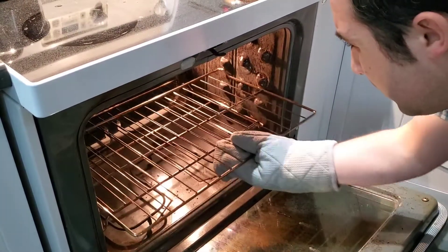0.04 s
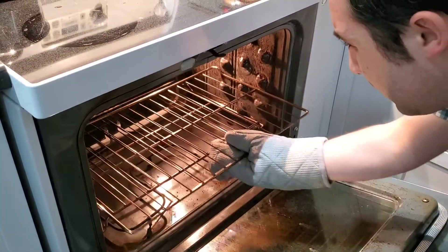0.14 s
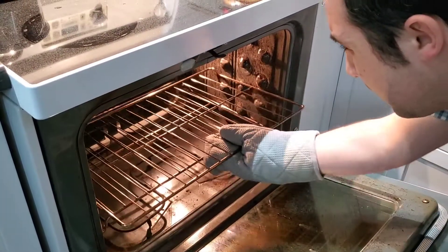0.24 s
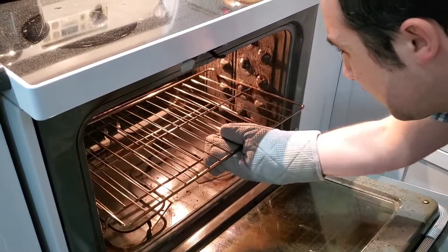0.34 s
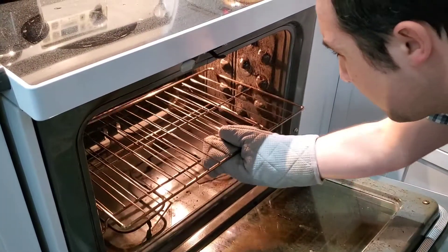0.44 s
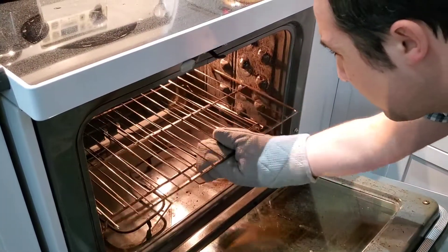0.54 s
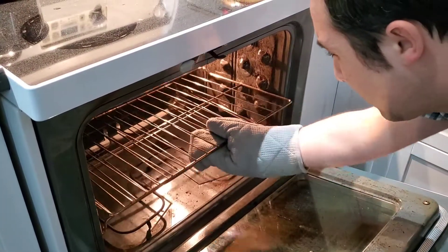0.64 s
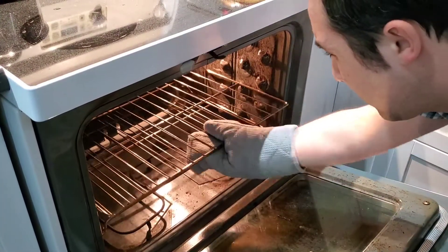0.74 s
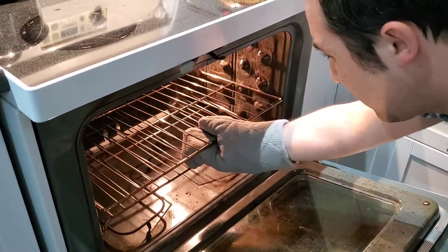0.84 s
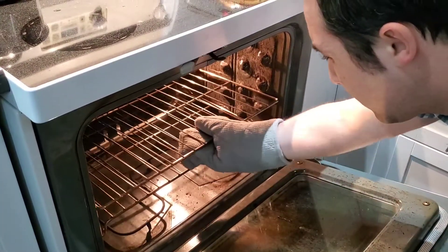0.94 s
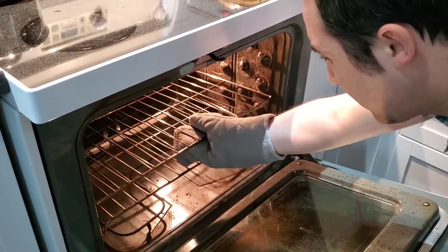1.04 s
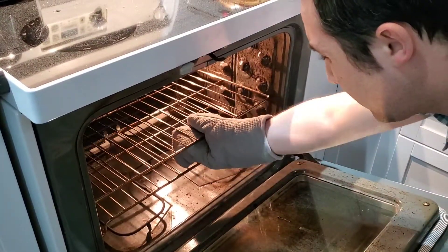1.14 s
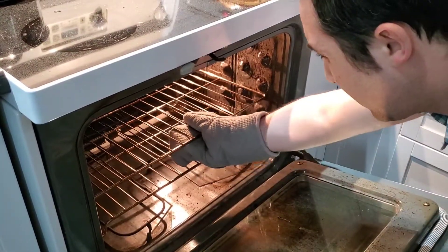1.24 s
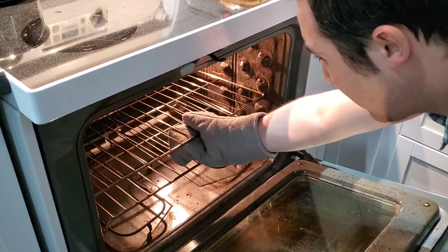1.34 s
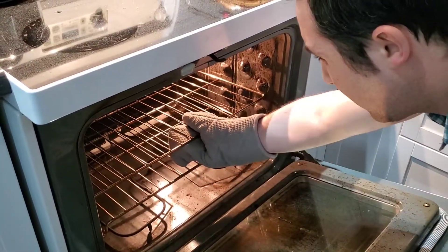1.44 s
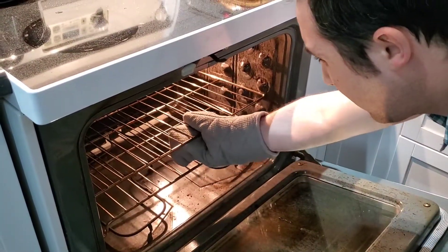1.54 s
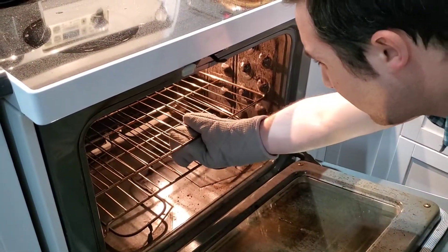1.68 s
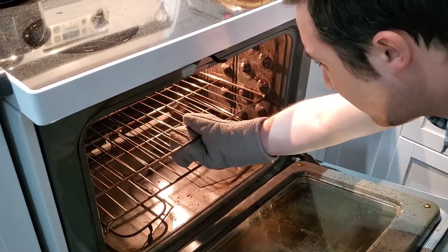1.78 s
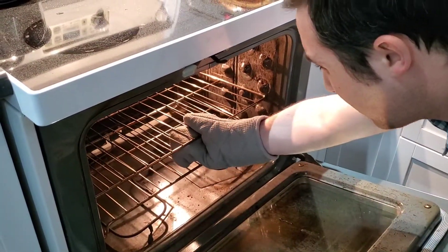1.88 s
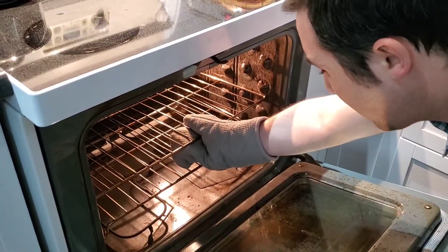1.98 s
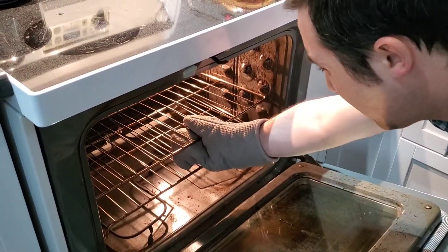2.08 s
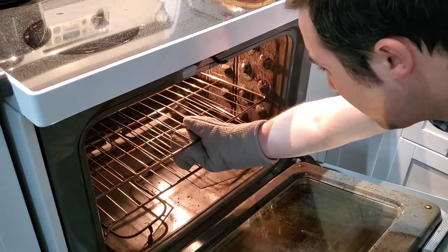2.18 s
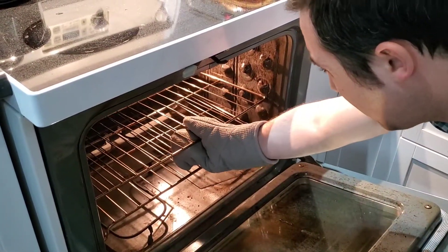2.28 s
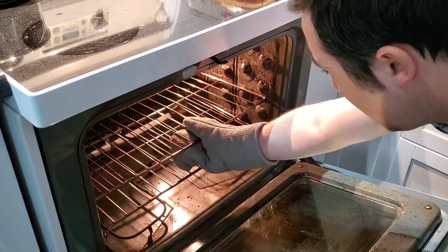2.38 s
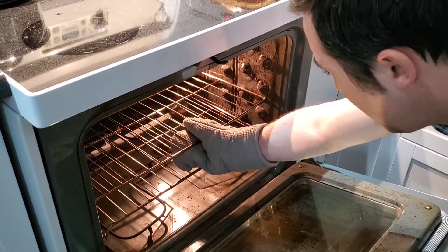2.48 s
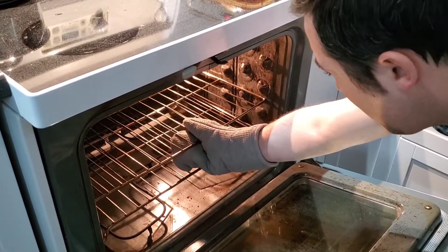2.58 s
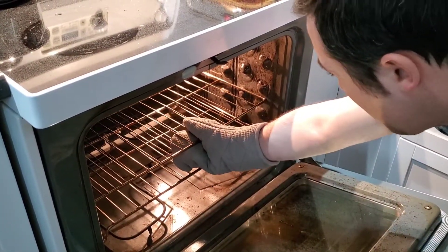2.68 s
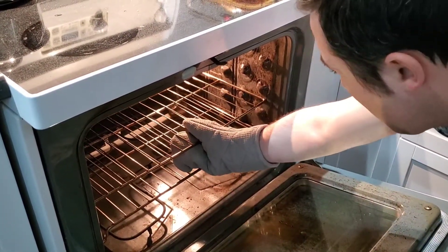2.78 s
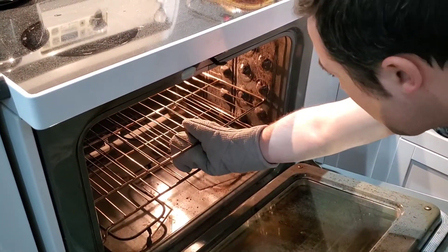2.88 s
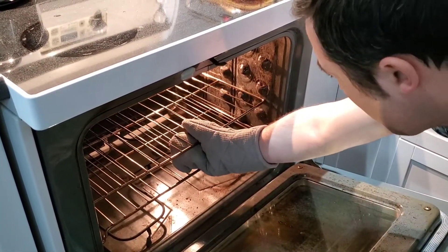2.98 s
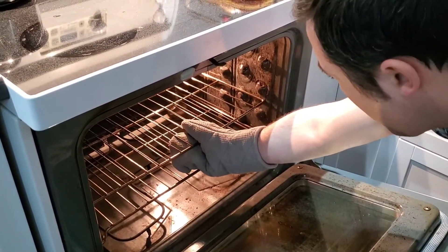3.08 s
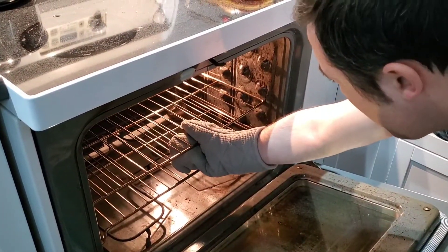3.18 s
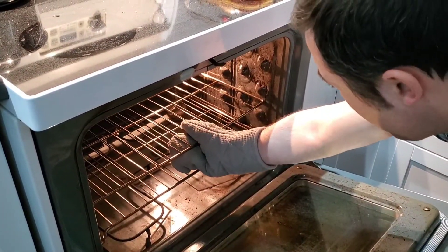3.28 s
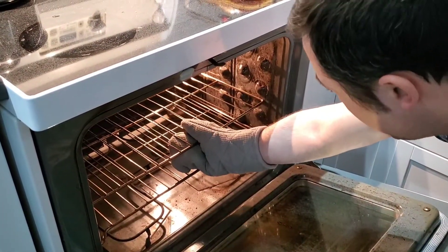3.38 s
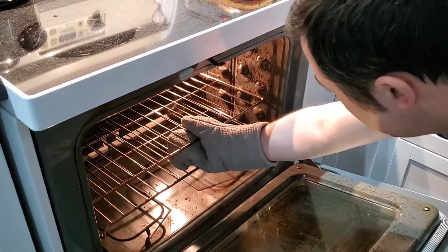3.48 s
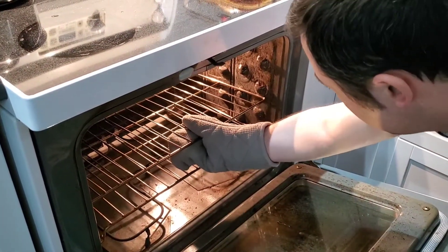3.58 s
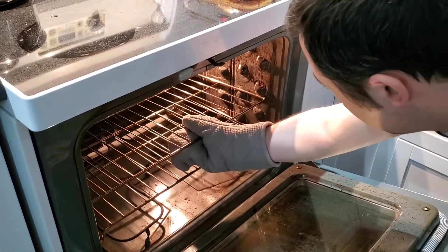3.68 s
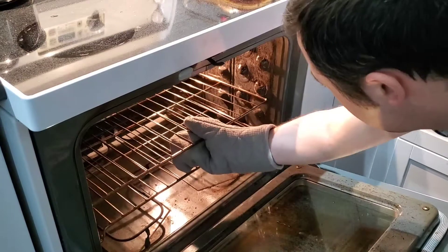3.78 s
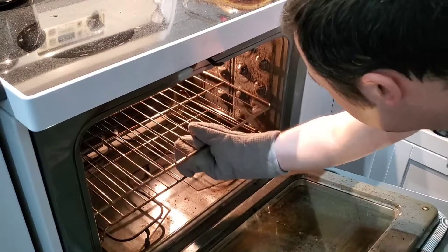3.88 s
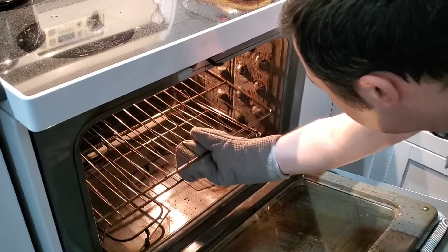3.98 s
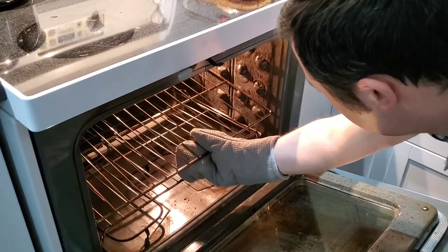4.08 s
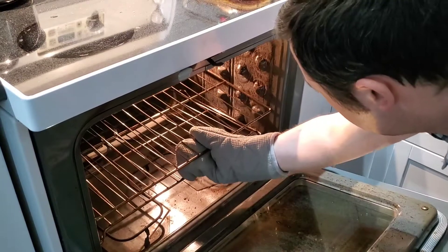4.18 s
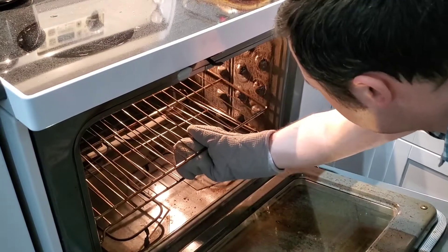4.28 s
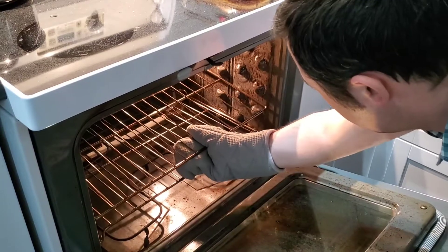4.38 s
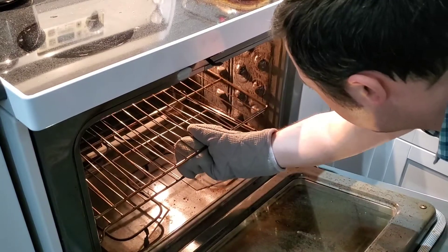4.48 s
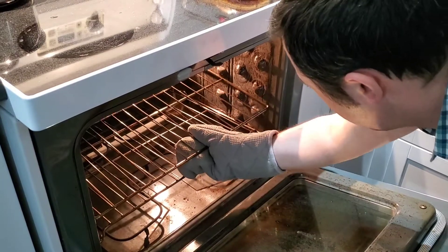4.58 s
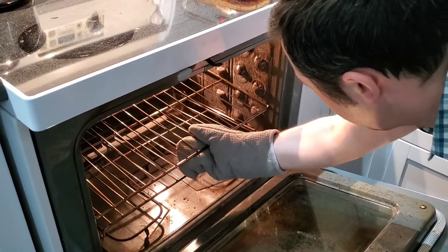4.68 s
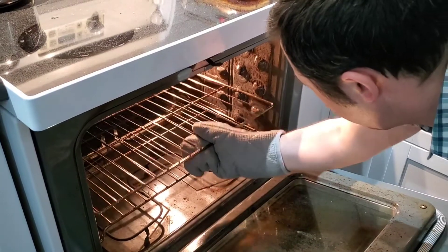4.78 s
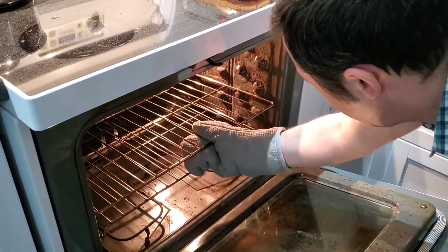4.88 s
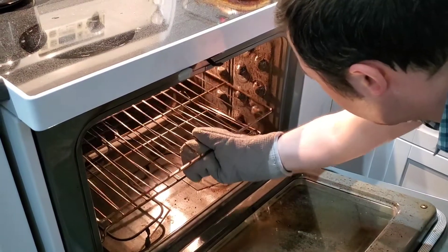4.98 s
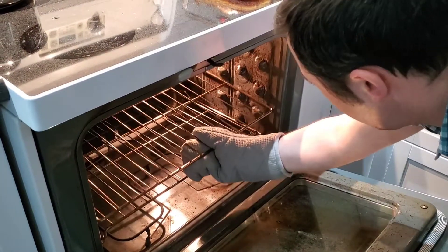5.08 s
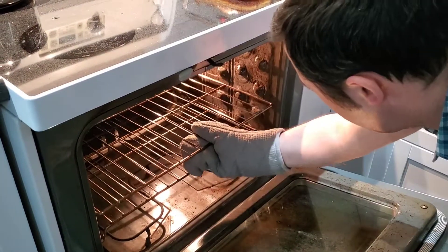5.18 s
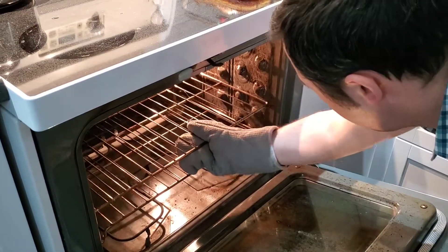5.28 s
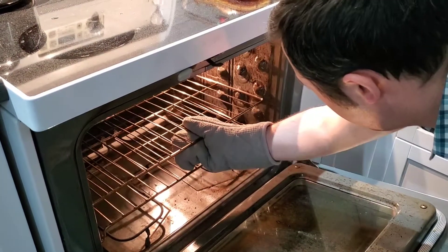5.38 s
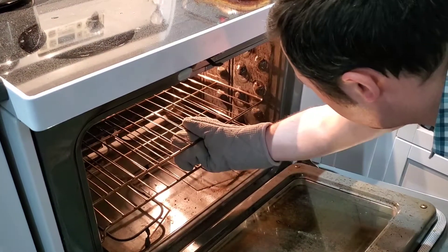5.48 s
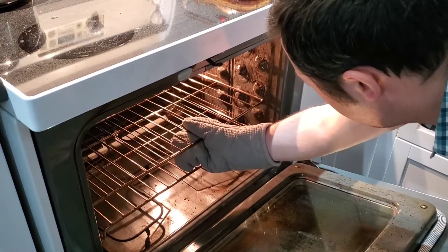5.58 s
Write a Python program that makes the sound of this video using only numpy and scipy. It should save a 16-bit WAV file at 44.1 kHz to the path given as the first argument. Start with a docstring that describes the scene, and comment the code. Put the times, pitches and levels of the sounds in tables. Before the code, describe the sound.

A metal wire oven rack scrapes and clanks against its side supports, with ringing wires and low booms from the oven walls.

```python
"""A wire rack is wiggled into an oven in a quiet home kitchen.
From the start it drags over the side supports by stick-slip, as noise rings fed by tiny random blows.
It knocks on the supports, exciting wire and frame modes; at each push the sheet-steel walls boom.
Later its swinging wires chatter in runs of light touches, and a wire tip ticks on the enamel.
Rack, oven cavity and kitchen ring on as decaying modes and dense noise resonances."""
import sys
import numpy as np
from scipy import signal
from scipy.fft import rfft, irfft, next_fast_len
from scipy.io import wavfile

SR = 44100
rng = np.random.default_rng(int(sys.argv[2]) if len(sys.argv) > 2 else 0)


def log_audio(samples):
    """Write samples as a 16-bit WAV file to the path given in sys.argv[1]."""
    # one column per channel
    frames = np.atleast_2d(samples).T
    # limit to full scale, then quantise
    limited = np.clip(frames, -1, 1)
    pcm = np.round(limited * 32767).astype(np.int16)
    wavfile.write(sys.argv[1], SR, pcm)


N = 248369
TAIL = np.arange(SR) / SR   # time after a blow, s


def from_db(db):
    """Level to amplitude: 20 dB is a factor of ten."""
    return 10 ** (np.asarray(db) / 20)


def rms_one(x):
    """Normalisation to unit root-mean-square amplitude."""
    return x / np.sqrt(np.mean(x ** 2) + 1e-20)


def at_hz(points, hz):
    """Interpolation of a table on a logarithmic frequency axis."""
    points = np.array(points)
    return np.interp(np.log(hz + 1e-9), np.log(points[:, 0]), points[:, 1])


def fade(t60):
    """Exponential decay: the amplitude falls by 60 dB in t60 seconds (5 ms at least)."""
    return 1000. ** (-TAIL / max(t60, .005))


def add(out, s, sound):
    """Linear superposition: mix a sound in at time s."""
    start = max(round(s * SR), 0)
    out[:, start:start + sound.shape[1]] += sound[:, :N - start]


# interaural coherence: columns f/Hz, likeness of the ears (0-1)
EAR_LIKENESS = [(100, .998), (250, .985), (500, .9), (1000, .64), (2000, .42), (4000, .22), (12000, .3)]


def stereo_noise(colour, ripple_db=4.0, spacing_hz=38):
    """Random-phase synthesis: coloured noise with irregular partials, the ears most alike in the bass."""
    size = next_fast_len(N, True)
    hz = np.fft.rfftfreq(size, 1 / SR)
    # the spectrum falls steeply past both ends of the table
    low_skirt = np.minimum(hz / colour[0][0], 1)
    high_skirt = np.minimum(colour[-1][0] / (hz + 1), 1)
    skirts = (low_skirt * high_skirt) ** 3
    # resonances crowd into peaks and leave gaps, most clearly in the wires' own range
    heights = np.interp(hz / spacing_hz, np.arange(2000), rng.standard_normal(2000))
    depth = at_hz([(300, 0), (800, 1), (4000, 1), (12000, .5)], hz)
    magnitude = skirts * from_db(at_hz(colour, hz) + ripple_db * depth * heights)
    # a shared and an opposed part give the ears the wanted coherence
    alike = np.clip(at_hz(EAR_LIKENESS, hz), 0, 1)
    mid, side = np.exp(2j * np.pi * rng.random((2, len(hz))))
    ears = np.sqrt(1 + alike) * mid + np.sqrt(1 - alike) * side * [[1], [-1]]
    return rms_one(irfft(ears * magnitude, size)[:, :N])


def wire_cluster(hz, mistune, count=4):
    """Beating: near-identical wires ring at almost the same pitch (mistune is a fraction of it)."""
    pitches = hz * (1 + mistune * rng.uniform(-1, 1, (count, 1)))
    angles = (2 * np.pi * (pitches * TAIL + rng.random((count, 1)))).astype(np.float32)
    tone = np.cos(angles).sum(axis=0) + 1j * np.sin(angles).sum(axis=0)
    return tone / np.sqrt(np.mean(np.abs(tone[:SR // 4]) ** 2))


def rebounds(times, length_s, fall_db, count):
    """Repeated impact: a first touch, then uneven, on average weakening ones, as samples and energy shares."""
    chance = rng.random((len(times), 2, count))
    when = (np.arange(count) + chance[:, 0] * (np.arange(count) > 0)) / count
    energy = from_db(-fall_db * when - 10 * chance[:, 1]) ** 2
    energy[:, 0] = from_db(-5) ** 2   # the first touch is always equally firm before sharing
    at = (times[:, None] + when * np.reshape(length_s, (-1, 1))) * SR
    return np.clip(at.astype(int), 0, N - 1), energy / energy.sum(axis=1, keepdims=True)


def dense_ring(colour, touches, db, crack_db, cavity_t60, room_db, room_t60):
    """Statistical energy decay: touches feed a direct crack and decays in the oven and the kitchen."""
    at, shares = touches
    blow_energy = shares * from_db(db)[:, None] ** 2
    fed = np.bincount(at.ravel(), blow_energy.ravel(), N) + 1e-18
    energy = 0
    for level, t60 in [(crack_db, .012), (0, cavity_t60), (room_db, room_t60)]:
        kept = from_db(-60 / (t60 * SR)) ** 2   # energy kept from sample to sample
        energy = energy + from_db(level) ** 2 * signal.lfilter([1], [1, -kept], fed)
    return np.sqrt(energy) * stereo_noise(colour)


def struck(modes, times, db, rise_s, ear_spread, mistune=0.00892):
    """Modal superposition: each blow excites the modes unequally, out of step at the ears (spread in rad)."""
    tones = np.array([from_db(level) * fade(t60) * wire_cluster(hz, mistune)
                      for hz, level, t60 in modes], np.complex64)
    onset = 1 - np.exp(-TAIL / rise_s)
    tones *= np.sqrt(2) / np.linalg.norm(from_db(np.array(modes)[:, 1])) * onset
    out = np.zeros((2, N))
    for s, level in zip(times, db):
        phases = 2 * np.pi * rng.random(len(modes)) + ear_spread * rng.normal(0, 1, (2, len(modes)))
        shares = from_db(level + 2 * rng.normal(0, 1, len(modes))) * np.exp(1j * phases)
        add(out, s, (shares.astype(np.complex64) @ tones).imag)
    return out


# spectral density of the quiet kitchen: columns f/Hz, relative level/dB per Hz
KITCHEN_AIR = [(25, -11.5), (60, -2.5), (100, -5), (200, -17), (370, -6), (500, -26.5), (1200, -28),
               (2200, -27), (5000, -32), (16000, -32.5)]


def kitchen():
    """Stationary background noise: the quiet of the kitchen at a steady level."""
    return from_db(-74.5) * stereo_noise(KITCHEN_AIR, ripple_db=3)


# the hand's effort, as the rumble of the walls: columns t/s, level/dB
HAND_EFFORT = [(0, -38), (.33, -55), (.72, -44), (.95, -47.5), (1.35, -45), (1.8, -62.5), (2.25, -53.5),
               (2.55, -43.5), (2.8, -61.5), (3.1, -82), (3.39, -71), (3.55, -40), (3.8, -49.5),
               (4.12, -30.5), (4.44, -48), (4.75, -37), (5.15, -43), (5.63, -49)]
# the rack slides along the supports: columns start t/s, length t/s, scrape level/dB, hiss level/dB
RACK_SLIDES = [(-.03, 0.11, -43, -54), (0.11, 0.12, -43.5, -55.5), (0.262, 0.17, -58, -68.5),
               (0.452, 0.13, -48, -57), (0.581, 0.078, -40, -55), (0.717, 0.13, -48, -58),
               (0.876, 0.16, -59.5, -64), (0.96, 0.1, -47, -55.5), (1.15, 0.09, -47, -57),
               (1.223, 0.081, -38, -54), (2.262, 0.092, -47, -59.5), (2.5, 0.031, -56, -55),
               (3.464, 0.082, -44.5, -61), (3.935, 0.38, -39.5, -56), (4.767, 0.063, -35.5, -68),
               (4.923, 0.22, -46.5, -55.5), (5.332, 0.22, -50, -68)]
SLIDE_ATTACK_S, SLIDE_RELEASE_DB_PER_S = 0.061, 184


def drag_levels():
    """Amplitude envelopes: light rubbing follows the effort; each slide swells and then dies away."""
    t = np.arange(N) / SR
    effort = from_db(np.interp(t, *np.transpose(HAND_EFFORT)))
    scrape, hiss, rumble = effort * from_db(-17.5), effort * from_db(-25.5), effort * from_db(1)
    for start, length, scrape_db, hiss_db in RACK_SLIDES:
        swell = np.clip((t - start) / SLIDE_ATTACK_S, 0, 1)
        release = from_db(-SLIDE_RELEASE_DB_PER_S * np.clip(t - start - length, 0, 1))
        scrape = np.maximum(scrape, from_db(scrape_db) * swell * release)
        hiss = np.maximum(hiss, from_db(hiss_db) * swell * release)
    return scrape, hiss, rumble


def slip_train(per_s, spread_db):
    """Random impulse process: tiny blows of uneven size and either sign."""
    slips = rng.random(N) < per_s / SR
    return slips * from_db(spread_db * rng.standard_normal(N)) * rng.choice([-1, 1], N)


# spectral densities of scraped wires, contact clicks (also the hiss) and rumbling walls:
# columns f/Hz, relative level/dB per Hz
SCRAPE_COLOUR = [(400, 9), (520, 6), (800, 3), (1100, 3.5), (1500, 2), (2000, -3.5), (2900, -6.5),
                 (4100, -2.5), (4800, -10.5), (6500, -17), (8000, -41.5)]
CLICK_COLOUR = [(1000, -21), (2000, -0.5), (5500, -4), (7800, -3), (10000, 1), (13000, 0.5), (16000, 2)]
RUMBLE_COLOUR = [(25, -31.5), (60, -10.5), (84, 7.5), (105, -5), (135, -6.5), (220, -6.5), (370, -9),
                 (450, -20), (700, -18.5)]


def drag(squeak_hz=1530, squeak_db=-24):
    """Stick-slip friction: wire on enamel sends tiny blows into the rack, with hiss and wall rumble."""
    scrape, hiss, rumble = drag_levels()
    wires = stereo_noise(SCRAPE_COLOUR, ripple_db=2.0)[:, :SR] * (fade(0.0063) + from_db(4) * fade(0.29))
    # the rubbed wire answers with a faint rough squeak
    wires = wires + from_db(squeak_db) * wire_cluster(squeak_hz, mistune=0.071).imag * fade(.2)
    grit = stereo_noise(CLICK_COLOUR)[:, :SR] * (fade(0.009) + fade(0.17))
    # convolution: every slip starts the whole response afresh
    coarse_slips = slip_train(per_s=450, spread_db=6)[None]
    fine_slips = slip_train(per_s=2600, spread_db=4.5)[None]
    wires = rms_one(signal.fftconvolve(wires, coarse_slips, axes=1)[:, :N])
    grit = rms_one(signal.fftconvolve(grit, fine_slips, axes=1)[:, :N])
    return scrape * wires + hiss * grit + rumble * stereo_noise(RUMBLE_COLOUR)


# lowest modes of the oven wall: columns f/Hz, relative level/dB
OVEN_WALL_MODES = [(66, -42.5), (81, -19.5), (87, 16.5), (112, -2)]


def boom(times, db, swell_s=0.018, ring_db=-24, ring_t60=0.78):
    """Forced panel vibration: the wall swells into its lowest modes and soon settles to a weak ring."""
    rise = TAIL / swell_s
    tone = rms_one(sum(from_db(level) * np.sin(2 * np.pi * hz * TAIL) for hz, level in OVEN_WALL_MODES))
    swell = rise * np.exp(1 - rise)
    ring = from_db(ring_db) * (1 - np.exp(-rise)) * fade(ring_t60)
    out = np.zeros((2, N))
    for s, level in zip(times, db):
        add(out, s, from_db(level) * (tone * (swell + ring))[None])
    return out


# rack strikes a support, nominal levels before each layer's offset:
# columns t/s, wire clang level/dB, wall clunk level/dB, contact click level/dB
SUPPORT_KNOCKS = [(0.001, -38, -34, -46), (0.468, -43.5, -40, -61), (0.63, -36, -34.5, -47.5),
                  (1.12, -42, -34, -57.5), (1.220, -29.5, -24, -43), (1.277, -36.5, -31.5, -44.5),
                  (1.324, -39.5, -34, -46), (1.897, -54, -50.5, -105), (1.923, -57.5, -46.5, -113),
                  (2.009, -59.5, -52, -113), (2.137, -44, -49, -66), (2.215, -38, -48, -58),
                  (2.275, -36, -49, -56), (2.333, -37, -45.5, -71), (2.511, -45.5, -38.5, -59),
                  (2.533, -45, -34.5, -66), (2.621, -83, -51, -61), (2.662, -45, -54.5, -70.5),
                  (3.192, -73.5, -59.5, -102), (3.402, -53.5, -78, -38), (3.559, -38.5, -32, -49.5),
                  (3.889, -22.5, -25.5, -33), (3.972, -27, -30, -39), (4.024, -27.5, -26, -44),
                  (4.033, -24.5, -22, -39.5), (4.09, -31.5, -34, -54), (4.156, -32, -50, -51.5),
                  (4.193, -24, -22.5, -45), (4.27, -28.5, -24, -51), (4.311, -36.5, -55, -77),
                  (4.515, -28, -29.5, -48), (4.657, -33, -34.5, -53.5), (4.77, -27.5, -23, -35.5),
                  (5.015, -24.5, -27.5, -34), (5.034, -30, -30.5, -63), (5.31, -33.5, -33, -52.5)]
# wire modes of the rack, then slow bending modes of its frame: columns f/Hz, relative level/dB, t60/s
WIRE_MODES = [(486, 2, 0.56), (634, -5, 0.45), (667.6, 5, 0.41), (670, -10, 0.42), (830, 8, 0.3),
              (910, -3, 0.89), (1088, -16.5, 0.48), (1189, 0.5, 0.89), (1222, -8, 0.8), (1360, -4.5, 0.15),
              (1600, -5.5, 0.23), (1519, 5, 0.15), (1610, 10, 0.22), (1635, 6.5, 0.22), (1780, 6.5, 0.14),
              (1965, 3.5, 0.31), (2060, -1.5, 0.35), (2355, -5.5, 0.44), (2515, -1, 0.62),
              (2430, -8.5, 0.5), (3503, -0.5, 0.41), (3640, -2, .5), (3720, -11.5, .45),
              (3770, -11.5, 0.35), (3880, -8, 0.6), (3820, -15, 0.42)]
BENDING_MODES = [(169.6, -6, 0.95), (206.9, -10.5, 0.4), (232.4, -12, 0.98), (266.7, -5.5, 1.04),
                 (328.4, -3, 0.85), (370.8, 2, 0.2), (379, -8.5, 1.08)]
# spectral densities of the dense resonances: columns f/Hz, relative level/dB per Hz
CLANG_COLOUR = [(420, -25), (490, -4.5), (700, 2.5), (800, 1), (1200, 5), (1750, 2), (2150, -1.5),
                (2400, -25)]
ZING_COLOUR = [(1900, -2), (2300, 1.5), (2750, -3), (3300, 0), (3600, 0), (4050, 0), (4500, -4.5),
               (5000, -10.5), (6500, -14.5), (7800, -25.5)]
SINGING_COLOUR = [(450, -8), (730, 4), (820, -25), (930, 6), (1200, 0.5), (1400, -12.5), (2200, -18),
                  (2400, -8.5), (2560, -9), (2750, -30), (3450, -27.5), (3700, -1), (4080, -13),
                  (4400, -35.5)]
CLUNK_COLOUR = [(100, 3), (120, -3.5), (220, -1), (280, -13), (340, -5), (378, -3.5), (415, -23.5),
                (500, -10.5)]


def knocks():
    """Impact excitation: each blow rebounds and rings wires, frame and wall; harder contacts zing more."""
    s, clang_db, clunk_db, click_db = np.transpose(SUPPORT_KNOCKS)
    # the zing lies between clang and click
    zing_db = clang_db + 0.84 + 0.32 * (click_db - clang_db)
    # a -57 dB click chatters for 15 ms, one 28 dB harder for half as long
    chatter_s = 0.015 * .5 ** ((click_db + 57) / 28)
    touches = rebounds(s, chatter_s, fall_db=13, count=6)
    wires = dense_ring(CLANG_COLOUR, touches, clang_db - 0.5,
                       crack_db=-10, cavity_t60=0.15, room_db=-4.5, room_t60=0.4)
    wires += dense_ring(ZING_COLOUR, touches, zing_db,
                        crack_db=-12, cavity_t60=0.28, room_db=-4.5, room_t60=0.4)
    wires += struck(WIRE_MODES, s, clang_db - 6, rise_s=0.00046, ear_spread=0.91)
    # the cross wires sing on in a few narrow bands
    wires += dense_ring(SINGING_COLOUR, touches, clang_db - 13,
                        crack_db=-10, cavity_t60=0.51, room_db=-4.5, room_t60=0.86)
    click = dense_ring(CLICK_COLOUR, touches, click_db + 0.5,
                       crack_db=7.5, cavity_t60=0.18, room_db=-1, room_t60=0.19)
    clunk = dense_ring(CLUNK_COLOUR, touches, clunk_db + 2.5,
                       crack_db=-5.5, cavity_t60=0.11, room_db=-5, room_t60=0.3)
    frame = struck(BENDING_MODES, s, clunk_db - 13.0, rise_s=0.0029, ear_spread=0.15)
    # every knock also stirs the wall's lowest modes
    return wires + click + clunk + frame + boom(s, clunk_db - 21)


# a firm shove flexes the oven wall: columns t/s, boom level/dB
WALL_SHOVES = [(0.005, -63), (0.388, -42), (0.457, -38), (0.634, -29), (0.692, -34.5), (0.824, -41),
               (1.115, -36), (1.325, -31), (2.527, -33.5), (3.433, -50.5), (3.973, -28.5), (4.024, -24.5),
               (4.157, -30), (4.262, -34), (4.768, -22.5), (5.042, -20), (5.378, -38.5)]


def shoves():
    """Panel flexure: the walls thud and boom when the rack is pushed home against them."""
    s, boom_db = np.transpose(WALL_SHOVES)
    touches = rebounds(s + 0.0028, 0.045, fall_db=7.5, count=6)
    thud = dense_ring(CLUNK_COLOUR, touches, boom_db - 8,
                      crack_db=7, cavity_t60=0.3, room_db=-9.5, room_t60=0.24)
    return boom(s, boom_db) + thud


# the rack swings and its wires buzz at each turn, nominal levels before each layer's offset:
# columns first turn t/s, buzz level/dB, time between turns t/s, number of turns
RACK_SWINGS = [(1.502, -45.5, .21, 2), (3.496, -35.5, .159, 3), (4.391, -41, .16, 1),
               (4.718, -32.5, .16, 1), (5.195, -41.5, .16, 1), (5.383, -33, .145, 2)]
# spectral density of the buzzing wires: columns f/Hz, relative level/dB per Hz
BUZZ_COLOUR = [(400, -6.5), (600, 2), (900, -2.5), (1300, -4.5), (1650, 4.5), (2150, 3), (2500, -18),
               (3000, -11.5), (3600, -3), (4100, -9), (4500, -27.5), (7000, -32), (15000, -33)]
SWING_LOSS_DB = 5.5   # loss from turn to turn


def buzzes():
    """Damped oscillation: at each turn of a dying swing the rack touches lightly in a run; its frame hums."""
    turns = [(start + k * period, db - k * SWING_LOSS_DB)
             for start, db, period, count in RACK_SWINGS for k in range(round(count))]
    s, buzz_db = np.transpose(turns)
    # the hum is nominally -35.5 dB at a -42.5 dB buzz and follows 0.63 of its change
    hum_db = -35.5 + 0.63 * (buzz_db + 42.5)
    touches = rebounds(s, .02, fall_db=3.5, count=12)
    wires = dense_ring(BUZZ_COLOUR, touches, buzz_db + 0.45,
                       crack_db=3, cavity_t60=0.17, room_db=-1.0, room_t60=0.39)
    wires += struck(WIRE_MODES, s, buzz_db - 5.0, rise_s=0.02, ear_spread=0.65)
    hum = dense_ring(CLUNK_COLOUR, touches, hum_db - 6.5,
                     crack_db=-5, cavity_t60=0.37, room_db=-5, room_t60=0.84)
    return wires + hum + struck(BENDING_MODES, s, hum_db - 4.5, rise_s=0.061, ear_spread=0.18)


# a wire tip ticks thinly on the enamel: columns t/s, level/dB
WIRE_TICKS = [(3.308, -72), (3.339, -66.5)]
# spectral density of a tick: columns f/Hz, relative level/dB per Hz
TICK_COLOUR = [(8200, -12), (9100, 2), (10000, -7), (11200, -1), (12500, -13), (14000, -7), (15800, -3.5)]


def ticks():
    """High-frequency excitation: touches too light to ring the rack stir only its highest resonances."""
    s, db = np.transpose(WIRE_TICKS)
    touches = rebounds(s, .006, fall_db=7, count=4)
    return dense_ring(TICK_COLOUR, touches, db, crack_db=9, cavity_t60=.15, room_db=-3.5, room_t60=0.39)


# interaural level difference: columns f/Hz, left minus right level/dB
EAR_LEAN = [(250, .3), (700, -.9), (1400, -2.2), (2700, -2.5), (4500, 1.8), (9000, 2.8), (14000, 2.2)]
LEFT_LEAD_S = .00009


def placed(x):
    """Interaural differences: the oven is a little to the left, its opening throws some bands to one side."""
    size = next_fast_len(N + 4096)
    hz = np.fft.rfftfreq(size, 1 / SR)
    left, right = rfft(x, size)
    lean = from_db(at_hz(EAR_LEAN, hz) / 2)
    delay = np.exp(-2j * np.pi * hz * LEFT_LEAD_S)
    return irfft(np.array([left * lean, right / lean * delay]), size)[:, :N]


def scene():
    """Superposition: dragging, knocks, shoves, buzzes and ticks over the quiet of the kitchen."""
    rack = drag() + knocks() + shoves() + buzzes() + ticks()
    return placed(rack) + kitchen()


def record(dry):
    """Elliptic low-pass filtering: the top is cut steeply above 16350 Hz."""
    return signal.sosfilt(signal.ellip(12, .2, 80, 16350, fs=SR, output="sos"), dry)


dry = scene()
out = record(dry)
log_audio(out)
```